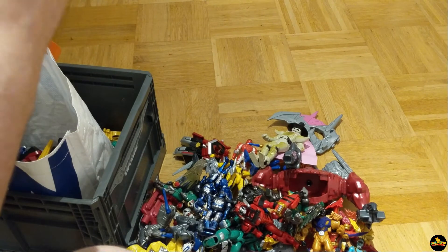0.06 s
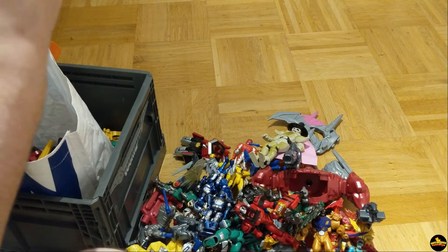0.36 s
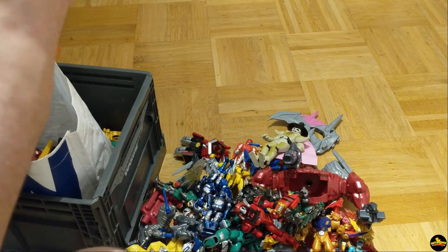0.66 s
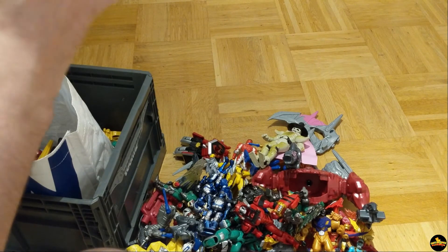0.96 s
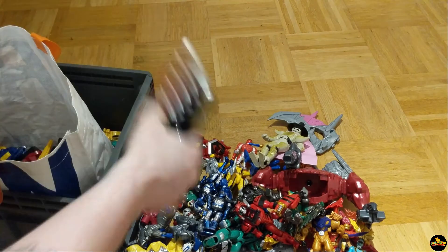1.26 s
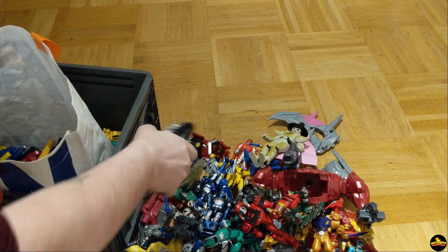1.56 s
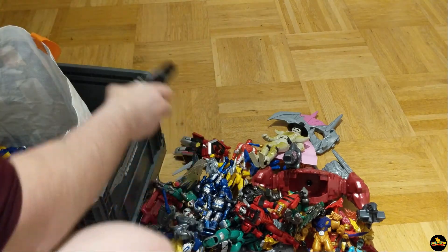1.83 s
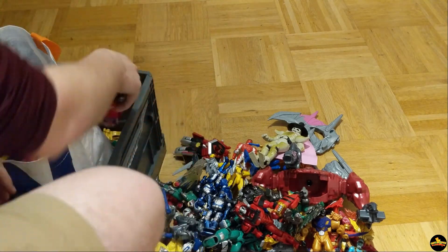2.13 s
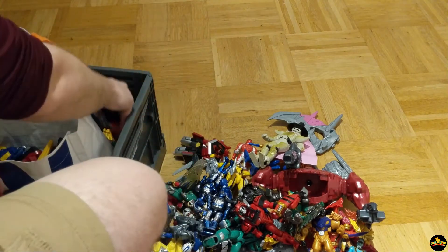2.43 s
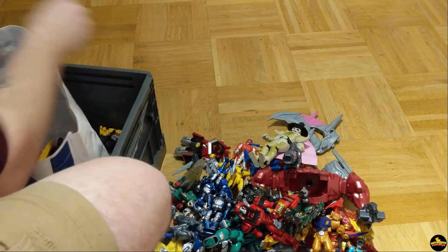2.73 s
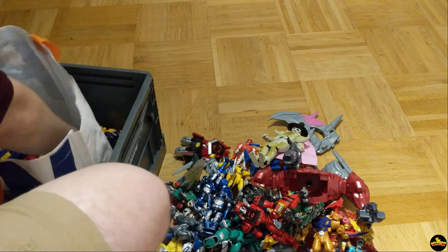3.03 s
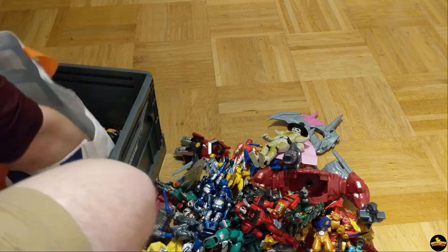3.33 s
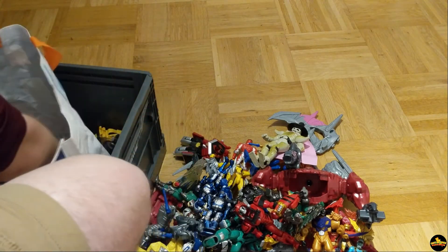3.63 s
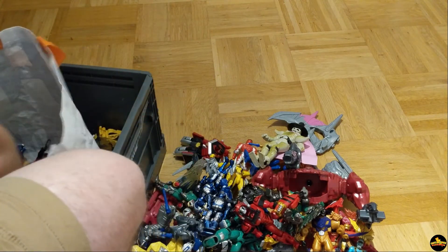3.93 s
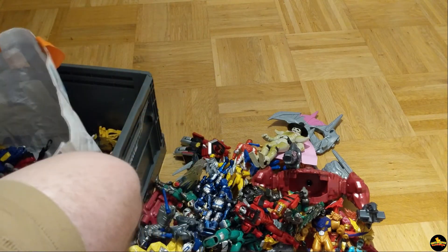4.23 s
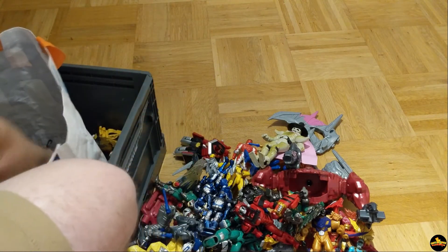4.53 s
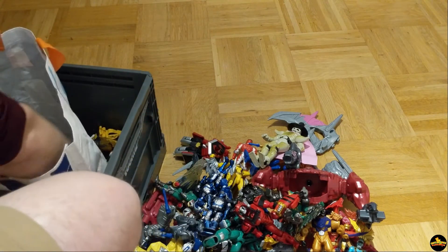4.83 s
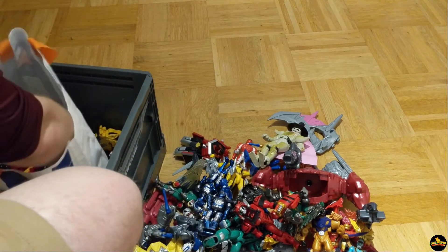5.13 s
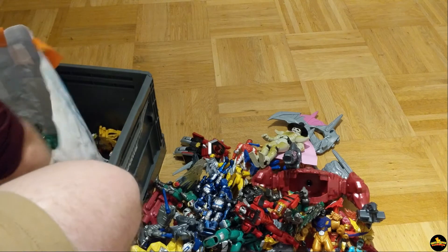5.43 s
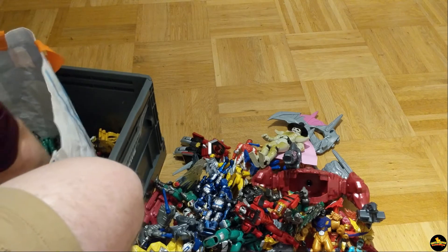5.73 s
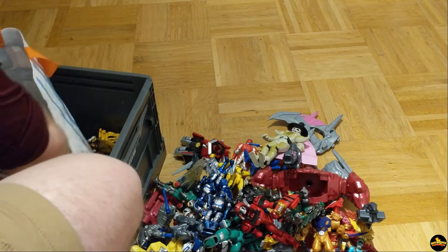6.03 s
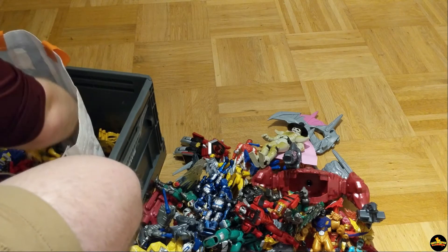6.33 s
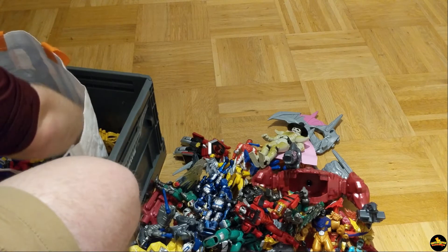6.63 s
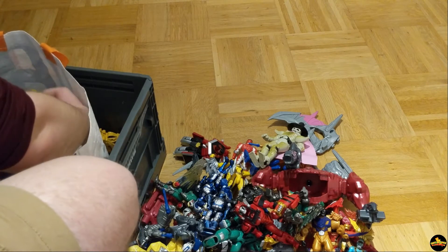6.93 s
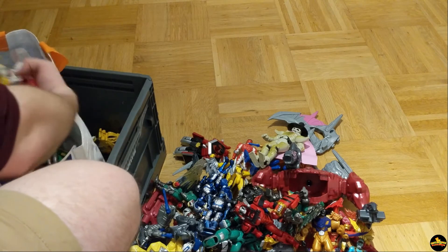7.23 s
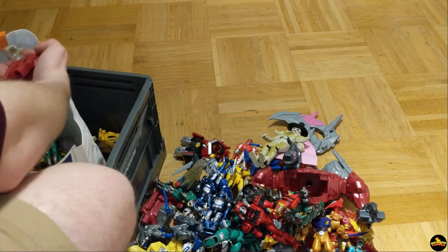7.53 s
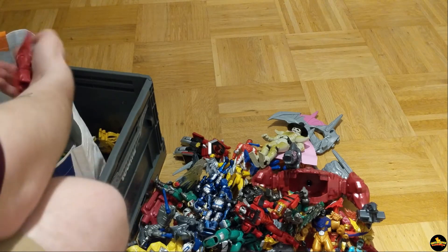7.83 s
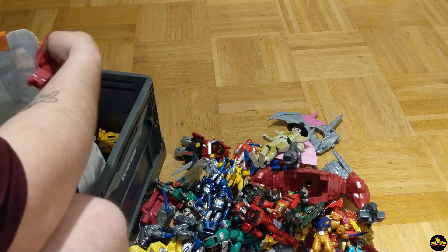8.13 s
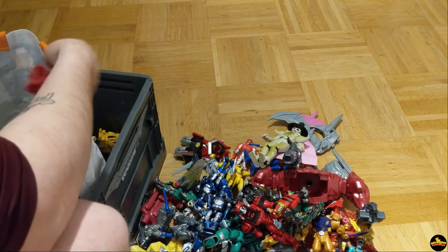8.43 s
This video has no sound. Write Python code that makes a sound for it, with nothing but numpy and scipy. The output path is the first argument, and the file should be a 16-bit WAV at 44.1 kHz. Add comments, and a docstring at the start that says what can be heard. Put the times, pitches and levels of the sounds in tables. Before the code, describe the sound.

A few faint plastic taps lead to one sharp, fairly dry snap at about 1 second. Light knocks and soft handling of toy figures follow, with a tiny plastic squeak near 1.4 seconds. From about 2.6 seconds hands rummage through hard toys in a shopping bag inside a plastic crate: a dense, uneven clatter of clicks and hollow knocks, with the bag crinkling along in surges. The crate thuds as the load shifts and the wooden floor booms softly underneath. The rummaging is loudest from 3.5 to 6 seconds, then eases and ends with a firm, hollow knock at about 6.7 seconds. After a lull with faint ticks, a small cluster of lighter clacks comes near 8 seconds, then very faint rubbing squeaks. It all sounds nearby, in a bare room with a short echo and faint room tone.

```python
"""A few light taps and one sharp plastic snap, then hands rummage through hard toy figures for four
seconds; a toy drops back and another is lifted out. The toys lie in a shopping bag inside a plastic
crate, in a bare room with a wooden floor. Each knock rings the crate, the hollow bodies, their limbs
and their small hard edges. Stirring is a stream of tiny contacts with the bag crinkling along,
and the floorboards boom softly underneath."""
import sys
import numpy as np
from scipy import signal
from scipy.fft import rfft, irfft
from scipy.io import wavfile
from scipy.ndimage import uniform_filter1d

SR = 44100
rng = np.random.default_rng(int(sys.argv[2]) if len(sys.argv) > 2 else 0)


def unload_audio(sound):
    """Save the sound as a 16-bit wav file, at the path given as the first command line argument."""
    columns = np.transpose(np.atleast_2d(sound))
    # keep every value between -1 and 1, then stretch to whole-number steps
    steps = np.round(np.clip(columns, -1, 1) * 32767)
    wavfile.write(sys.argv[1], SR, steps.astype(np.int16))


N = 381906

# toy knocking on toy: time_s, level_db, pitch_hz, focus (0 broad crack, 1 usual, 2 and up narrow ring)
TOY_KNOCKS = [(0.4338, -52, 5150, .7), (0.617, -62, 3320, 0.87), (0.631, -43, 5200, 1.1),
              (0.8268, -63.5, 3000, 0.92), (0.928, -51, 2920, 0.72), (1.241, -49.5, 2450, 2),
              (1.265, -51, 4740, 1.6), (1.286, -52.5, 6440, 1.3), (1.331, -41, 3970, .9),
              (2.006, -53, 2470, 0.86), (2.059, -41.5, 2520, 0.64), (2.067, -39.5, 5200, 1.4),
              (2.159, -46.5, 790, 1.9), (2.186, -43, 804, 1), (2.276, -42.5, 3220, .3),
              (2.406, -51.5, 1100, 1.5), (2.535, -43, 2070, 0.73), (2.616, -31, 5970, 1.0),
              (2.648, -25.5, 2400, 2.0), (2.651, -30, 4200, .9), (2.755, -32, 2580, 0.55),
              (2.882, -47.5, 1020, 2.05), (3.074, -35.5, 5700, 0.35), (3.087, -33, 4920, 0.74),
              (3.145, -32, 2530, 0.51), (3.269, -31.5, 3300, .4), (3.354, -37.5, 950, 0.82),
              (3.398, -30, 1600, 0.31), (3.455, -30, 4800, 0.31), (3.525, -27, 3070, 2.2),
              (3.585, -26, 4400, 0.8), (3.645, -26, 3300, 1.0), (3.817, -27.5, 1020, 0.39),
              (3.969, -30, 3020, 2.3), (4.006, -28.5, 3620, 1.9), (4.024, -32, 3780, 0.71),
              (4.0632, -22, 900, 1.0), (4.14, -30, 4350, 0.99), (4.289, -31, 2970, 0.26),
              (4.297, -27, 900, 0.56), (4.401, -28.5, 4620, 1.1), (4.463, -28, 4800, 0.49),
              (4.678, -27.5, 876, .9), (4.705, -27.5, 4550, 1.4), (4.821, -23, 1680, 1.6),
              (4.825, -25, 837, 0.77), (4.8845, -21, 4570, 1.3), (4.902, -31, 3720, 0.27),
              (5.032, -25.5, 4660, 1.6), (5.055, -29, 1150, 0.68), (5.09, -29.5, 1870, .3),
              (5.151, -37, 1500, 0.37), (5.292, -40, 980, 1.31), (5.315, -35.5, 2140, 0.47),
              (5.348, -31, 3380, 1.84), (5.43, -32, 4130, 0.4), (5.525, -32, 1184, 0.18),
              (5.583, -34, 4030, 1.1), (5.762, -30.5, 3270, 0.48), (5.776, -27.5, 2970, 0.5),
              (5.818, -23.5, 1300, .9), (5.872, -27, 925, 0.77), (5.958, -32.5, 525, 0.28),
              (6.031, -25, 1309, 0.93), (6.168, -33.5, 1050, 0.63), (6.194, -36.5, 1060, 0.34),
              (6.442, -38.5, 5730, 1.4), (6.501, -48, 550, 0.86), (6.522, -44.5, 5000, 1.3),
              (6.546, -40, 637, 0.65), (6.662, -29.5, 4600, .3), (6.665, -24.5, 522, 1.2),
              (6.85, -57, 826.8, .9), (7.395, -57, 6000, 0.89), (7.579, -49, 1670, 2.8),
              (7.581, -54, 3250, 2.8), (7.868, -38, 5494, 1.3), (7.874, -45, 3400, 1.2),
              (7.931, -42.5, 976, 0.84), (7.982, -41, 1600, 2.3), (7.984, -39.5, 945, 1.6),
              (8.121, -53, 764, 0.46), (8.287, -63, 4200, 0.32), (8.402, -62.5, 6540, .8)]
# where each part of a knock sits (crate, hollow body, limb, edge): centre_hz
PART_PITCHES_HZ = [300, 750, 1850, 4500]
# the hand sweeping the heap: time_a_s, time_b_s, time_c_s, level_db, depth_db (more crate, less bag)
# the times need not be in order: the earliest starts the sweep, the middle is loudest, the latest ends it
HAND_STROKES = [(0.0, 0, 0.038, -56, -3.5), (0.1, 0.3, 0.49, -70.5, -4), (1.23, 1.36, 1.61, -60, -1),
                (1.58, 1.74, 1.86, -57.5, -0.5), (2, 2.09, 2.37, -58, -1), (2.45, 2.603, 2.45, -50.5, 1.5),
                (2.599, 2.69, 2.75, -34.5, -1), (3.078, 3.115, 3.174, -35.5, 2),
                (3.258, 3.337, 3.28, -36.5, 1.5), (3.465, 3.6, 3.81, -27, -2.5),
                (3.837, 3.914, 4.11, -33, -1), (4.016, 4.127, 4.22, -32.5, -1),
                (4.311, 4.457, 4.5, -38.5, 2), (4.653, 4.724, 4.82, -33, 2),
                (4.827, 4.872, 5.01, -31, -5.5), (4.99, 5.112, 5.22, -37.5, -1.5),
                (5.292, 5.354, 5.627, -32, -1), (5.746, 5.8, 5.71, -29, 1), (5.861, 6.027, 6.17, -32, 3.5),
                (6.173, 6.24, 6.36, -45, 4.5), (6.453, 6.6, 7, -62.5, -3), (6.896, 7.15, 7.5, -67, -1),
                (7.893, 8.02, 8.08, -57, 8), (8.25, 8.4, 8.4, -73, 8.5)]
# a stiff plastic part catches and snaps home: time_s, level_db
SNAP_CRACKS = [(0.9456, -30.5), (0.9472, -24), (0.9485, -24)]
# the ring of that part: pitch_hz, level_db, t60_s
SNAP_RING = [(387, -10, 0.032), (950, -11.5, 0.014), (1107, 3.5, 0.025), (1540, -3, .022), (1700, -11, .02),
             (2150, -5, 0.047), (2600, 8.5, 0.015), (2770, 3, 0.029), (3270, 6.5, 0.013), (3670, -7, .008),
             (4700, 1, 0.011), (6000, 0, .01), (6350, 5, .015), (6630, 3.5, .015)]
# the load drops on the crate, the crate on the floor: time_s, crate_db, floor_db, top_hz (low is soft)
LOAD_THUDS = [(1.342, -47, -66, 209), (2.186, -43.5, -64, 500), (2.404, -44, -64, 380),
              (2.617, -43, -59, 420), (2.755, -43, -52, 500), (2.882, -47.5, -52, 500),
              (3.087, -35, -62, 600), (3.455, -30, -43, 400), (3.585, -33, -48, 400),
              (3.819, -23, -48.5, 550), (3.96, -30, -56, 400), (4.064, -26.5, -54, 700),
              (4.295, -29.5, -36, 600), (4.68, -29, -56, 554), (4.755, -27.5, -56, 450),
              (4.85, -25.5, -52, 600), (5.055, -31.5, -42, 600), (5.348, -34.5, -54, 450),
              (5.525, -35, -49, 400), (5.819, -19, -60, 556), (5.836, -20.5, -60, 211),
              (6.031, -29.5, -58, 450), (6.133, -38, -58, 300), (6.17, -33.5, -46, 350),
              (6.664, -21.5, -46, 480), (7.352, -45.5, -72, 450), (7.869, -46.5, -70, 600),
              (7.93, -41, -66, 600), (8.121, -48.5, -74, 398)]
# the ring of the loaded crate: pitch_hz, level_db, t60_s
CRATE_RING = [(81.5, -14.5, 0.035), (121, -5, 0.084), (153.9, -2, 0.11), (218.3, -3.5, 0.17),
              (246.4, 2.5, 0.082), (268.4, 1.5, 0.097), (341, -1, 0.065), (375, 1.5, 0.07),
              (430.4, 1, 0.067), (522, 4, 0.058), (570, -2.5, 0.027)]
# plastic rubbing on plastic: start_s, length_s, level_db, pitch_hz
RUB_SQUEAKS = [(1.43, 0.041, -53, 2370), (8.29, 0.08, -65, 2110), (8.365, 0.07, -62, 2350)]
# the ring of the floorboards: pitch_hz, level_db, t60_s
FLOOR_RING = [(43, -5.5, 0.27), (66.6, -9, .12), (83, 6, 0.22)]
# colour of plastic contacts through a microphone that dulls above 7.5 kHz: frequency_hz, level_db
PLASTIC_AT_MIC = [(450, 10.5), (700, 2.5), (1400, 1), (2600, -4.5), (4700, -7.5), (7200, -8.5), (8400, -21),
                  (11000, -23), (15500, -33.5)]
# colour of the crinkling bag through a microphone that dulls above 7.5 kHz: frequency_hz, level_db
BAG_AT_MIC = [(1500, -16.5), (3000, 1.5), (4300, -1), (7200, -4), (8400, -13.5), (11000, -28.5),
              (15500, -30)]
# toys held in the open sound dry, toys down in the crate wet: time_s, wet_db (reflected over direct)
WETNESS = [(0.43, -9), (0.63, -6.5), (1.3, 0.5), (2.05, 6.5), (2.27, -1.5), (2.6, 5.5), (6.66, 1), (7.5, 0),
           (7.87, 1.5)]
# reverb time of the bare room: frequency_hz, t60_s
ROOM_DECAY = [(100, 0.35), (300, 0.35), (800, 0.36), (2000, 0.38), (5000, 0.33), (13000, 0.34)]
# colour of the room tone: frequency_hz, level_db
AIR_COLOUR = [(20, -12.5), (60, -3), (140, 0), (400, -2), (700, -7.5), (1500, -12), (3000, -17),
              (6500, -15.5), (8500, -21), (15500, -23.5)]

CRATE_TOP_HZ, BODY_TOP_HZ, LIMB_TOP_HZ, CUTOFF_HZ = 465, 1197, 2832, 15850
PLACES = 4  # spots in the heap, each with its own reflections


def knocks(gap_s=0.0013, below_db_per_oct=7, above_db_per_oct=5):
    """A knock is a few contacts within milliseconds, each at another place in the heap."""
    walls = [crate() for _ in range(30)]
    bodies = [plastic(CRATE_TOP_HZ, BODY_TOP_HZ, t60=0.01, count=10) for _ in range(60)]
    limbs = [plastic(BODY_TOP_HZ, LIMB_TOP_HZ, t60=0.0074, count=16) for _ in range(60)]
    edges = [plastic(LIMB_TOP_HZ, CUTOFF_HZ, t60=0.014, count=70, size=700) for _ in range(60)]
    out = np.zeros((PLACES, N))
    for time_s, level_db, pitch_hz, focus in TOY_KNOCKS:
        open_db = max(-wetness_db(time_s), 0)  # a toy held in the open has few neighbours to strike
        shares = contact_shares(fade_db=2 + 0.47 * open_db)
        onsets = time_s + contact_lags(gap_s)
        # the part nearest the knock's pitch is loudest; the others fall away octave by octave
        octaves = np.log2(np.array(PART_PITCHES_HZ) / pitch_hz)
        loss_db = focus * np.maximum(above_db_per_oct * octaves, -below_db_per_oct * octaves)
        part_db = level_db - 0.5 - loss_db + loss_db.min()
        for parts, db in zip((walls, bodies, limbs, edges), part_db):
            for place, onset, share, k in zip(out, onsets, shares, rng.permutation(len(parts))):
                add(place, onset, hit_gain(db) * share * parts[k])
        # the toy's own note: two close modes that stand out more in a focused knock
        note_db = level_db - 6.5 + 2 * focus
        note_t60 = 0.024 * (PART_PITCHES_HZ[2] / pitch_hz) ** 0.4  # higher notes die sooner
        for place, onset, share in zip(out, onsets, shares):
            note = plastic(pitch_hz * 0.898, pitch_hz * 1.1, note_t60, count=2)
            add(place, onset, hit_gain(note_db) * share * note)
    return out


def plastic(low_hz, high_hz, t60, count, colour=PLASTIC_AT_MIC, spread_db=4.5, size=1500):
    """One tap on a plastic part: short modes scattered between two pitches."""
    hz = low_hz + (high_hz - low_hz) * (np.arange(count) + rng.random(count)) / count
    db = at_hz(colour, hz) + rng.normal(0, spread_db, count)
    decays = t60 * np.exp(rng.normal(0, 0.32, count))
    modes = band(ring(hz, db, decays, size), low_hz * 1.073, high_hz * 1.58)
    return unit(signal.lfilter([1, 1], 1, modes))  # a finite contact time softens the very top


def crate(spread_db=1.5):
    """One bump on the crate, its modes weighted by where the load strikes."""
    hz, db, t60 = np.transpose(CRATE_RING)
    detuned_hz = hz * np.exp(rng.normal(0, 0.026, len(hz)))  # the shifting load detunes the walls
    struck_db = db + rng.normal(0, spread_db, len(hz))
    return unit(band(ring(detuned_hz, struck_db, t60, size=6000), 71, 660))


def stirring():
    """Toys slide and tick against each other, the crate rumbles under them and the bag's creases pop."""
    walls = [crate() for _ in range(24)]
    toys = [plastic(CRATE_TOP_HZ, LIMB_TOP_HZ, t60=0.023, count=14, spread_db=7) for _ in range(100)]
    creases = [plastic(1414, CUTOFF_HZ, t60=0.014, count=44, colour=BAG_AT_MIC, spread_db=8, size=700)
               for _ in range(80)]
    rumble = grains(walls, per_s=160, spread_db=6, level_db=effort_db(depth_weight=0.95) - 2.5)
    clatter = grains(toys, per_s=190, spread_db=11, level_db=effort_db(depth_weight=0))
    rustle = grains(creases, per_s=280, spread_db=11, level_db=effort_db(depth_weight=-0.74) + 0.14)
    return rumble + clatter + rustle


def effort_db(depth_weight, attack_s=0.091, swell_db=4, ease_db=6.5, release_s=0.22):
    """The hand's envelope: each stroke catches, swells to its hardest push, eases off and lets go."""
    t, power = np.arange(N) / SR, 0
    for time_a_s, time_b_s, time_c_s, level_db, depth_db in HAND_STROKES:
        corners = np.sort([time_a_s - attack_s, time_a_s, time_b_s, time_c_s, time_c_s + release_s])
        shape_db = np.interp(t, corners, [-60, -swell_db, 0, -ease_db, -60])
        moving = (t > corners[0]) & (t < corners[-1])
        power = power + from_db(level_db + depth_weight * depth_db + shape_db) ** 2 * moving
    return 10 * np.log10(power + 1e-12)


def grains(sounds, per_s, spread_db, level_db, count=9000):
    """Random contacts of uneven size ride a level envelope, dealt out among the places in the heap."""
    out = np.zeros((PLACES, N))
    times = np.cumsum(rng.gamma(2, 0.5, count)) / per_s
    gains = from_db(rng.uniform(-spread_db, spread_db, count))
    gains /= np.sqrt(uniform_filter1d(gains ** 2, size=24))  # neighbouring contacts share the effort
    gains *= from_db(np.interp(times * SR, np.arange(N), level_db)) * np.sqrt(SR / per_s)
    gains *= rng.choice([-1, 1], count)
    for time_s, gain, k in zip(times, gains, rng.integers(0, len(sounds), count)):
        if time_s < N / SR:
            add(out[k % PLACES], time_s, gain * sounds[k])
    return out


def snap(crack_gain=0.91):
    """Three quick hard cracks, each setting the stiff part ringing."""
    out = np.zeros((len(SNAP_CRACKS), N))
    for place, (time_s, level_db) in zip(out, SNAP_CRACKS):
        crack = plastic(880, CUTOFF_HZ, t60=0.0056, count=80, spread_db=0.5, size=4000)
        ringing = unit(band(ring(*np.transpose(SNAP_RING), size=4000), 650, 7000))
        add(place, time_s, hit_gain(level_db) * unit(ringing + crack_gain * crack))
    return out


def thuds(gap_s=0.00149):
    """The load lands on the crate in quick, weakening contacts; soft ones stir only the low modes."""
    out = np.zeros((PLACES, N))
    shares = contact_shares(fade_db=1.5)
    for time_s, crate_db, _, top_hz in LOAD_THUDS:
        for place, lag, share in zip(out, contact_lags(gap_s), shares):
            bump = unit(band(crate(), 62, top_hz))
            add(place, time_s + lag, hit_gain(crate_db - 0.5) * share * bump)
    return out


def squeaks(waver=0.0049):
    """Plastic squeaks faintly on plastic: a short, unsteady tone that swells and fades."""
    out = np.zeros((1, N))
    for start_s, length_s, level_db, pitch_hz in RUB_SQUEAKS:
        size = int(length_s * SR)
        wobble = np.interp(np.linspace(0, 1, size), np.linspace(0, 1, 10), rng.standard_normal(10))
        phase = 2 * np.pi * np.cumsum(pitch_hz * (1 + waver * wobble)) / SR
        add(out[0], start_s, from_db(level_db) * np.hanning(size) * np.sin(phase))
    return out


def floorboards():
    """The wooden floor booms softly under the hand's uneven pressure and under each thud."""
    boards = unit(band(ring(*np.transpose(FLOOR_RING), size=11000), 35, 110))
    force = from_db(effort_db(depth_weight=1) - 23) * rng.standard_normal(N)
    for time_s, _, floor_db, _ in LOAD_THUDS:
        add(force, time_s, [hit_gain(floor_db)])
    return signal.oaconvolve(force, boards)[:N]


def room(places, wet_db):
    """An equal-power blend of each place's direct sound and its own reflections."""
    wet = from_db(wet_db)
    direct = places / np.sqrt(1 + wet ** 2)
    tails = reflections(len(places))
    return sum(x + signal.oaconvolve(wet * x, tail)[:N] for x, tail in zip(direct, tails))


def reflections(count, predelay_s=0.0024, build_s=0.0029):
    """Dense echoes that die away band by band, a separate unit-energy tail for each place."""
    t = np.arange(SR * 6 // 10) / SR
    fade_in = np.clip((t - predelay_s) / build_s, 0, 1)
    edges_hz = np.geomspace(30, CUTOFF_HZ, 11)
    tails = 0
    for low, high in zip(edges_hz, edges_hz[1:]):
        decay = from_db(-60 * t / at_hz(ROOM_DECAY, np.sqrt(low * high)))
        noise = band(rng.standard_normal((count, len(t))), low, high)
        tails = tails + np.sqrt(high - low) * unit(noise * decay * fade_in)
    return [unit(tail) for tail in tails]


def air(level_db=-60):
    """Room tone: a faint, steady bed of dark noise."""
    colour = from_db(at_hz(AIR_COLOUR, np.fft.rfftfreq(N, 1 / SR)))
    noise = irfft(rfft(rng.standard_normal(N)) * colour, N)
    return from_db(level_db) * np.sqrt(N) * unit(noise)


def wetness_db(time_s):
    """Reflected over direct level, higher the deeper the toys lie in the crate."""
    return np.interp(time_s, *np.transpose(WETNESS))


def contact_lags(gap_s):
    """Unevenly spaced delays of the contacts in one hit, in seconds."""
    return gap_s * np.r_[0, np.cumsum(rng.uniform(0.3, 1.7, PLACES - 1))]


def contact_shares(fade_db):
    """Gains that split one hit's energy, each contact weaker than the last."""
    return unit(from_db(-fade_db * np.arange(PLACES)))


def ring(hz, db, t60, size):
    """Struck modes dying away, each with random polarity; unit energy."""
    t = np.arange(size, dtype=np.float32) / SR
    tones = np.cos(np.outer(np.float32(2 * np.pi * hz), t))
    decays = np.exp(-np.outer(np.float32(np.log(1000) / t60), t))
    gains = from_db(db) * rng.choice([-1, 1], len(hz))
    return unit(gains @ (tones * decays).astype(float))


def hit_gain(db):
    """Gain that gives a unit-energy hit this level when averaged over 20 ms."""
    return from_db(db) * np.sqrt(SR / 50)


def from_db(db):
    """Decibels to gain."""
    return 10 ** (np.asarray(db) / 20)


def at_hz(points, hz):
    """Read a curve on a log-frequency axis."""
    points_hz, values = np.transpose(points)
    return np.interp(np.log(np.maximum(hz, 1)), np.log(points_hz), values)


def unit(x):
    """Scale to an energy of one."""
    return x / np.sqrt(np.sum(x ** 2) + 1e-20)


def band(x, low_hz, high_hz):
    """Gentle causal band-pass."""
    sos = signal.butter(2, [low_hz, min(high_hz, CUTOFF_HZ)], "band", fs=SR, output="sos")
    return signal.sosfilt(sos, x)


def add(out, time_s, sound):
    """Drop a sound onto a track."""
    start = min(max(round(time_s * SR), 0), N)
    out[start:start + len(sound)] += sound[:N - start]


def scene():
    """The mono mix: snap and squeaks fairly dry, stirring wet, knocks and thuds wetter with depth."""
    in_hand = room(snap(), wet_db=-5) + room(squeaks(), wet_db=-2)
    hits = room(knocks() + thuds(), wetness_db(np.arange(N) / SR))
    heap = room(stirring(), wet_db=4)
    return (in_hand + hits + heap + floorboards() + air())[None]


def record(dry):
    """A steep high cut on the whole mix."""
    return signal.sosfiltfilt(signal.ellip(10, 0.05, 60, CUTOFF_HZ, fs=SR, output="sos"), dry)


dry = scene()
out = record(dry)
unload_audio(out)
```